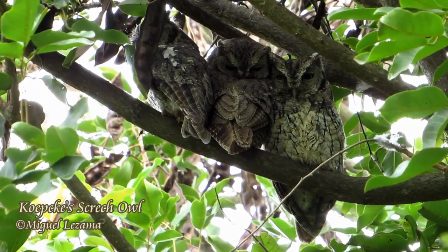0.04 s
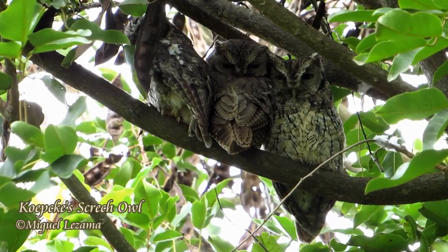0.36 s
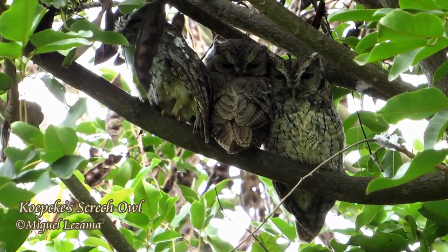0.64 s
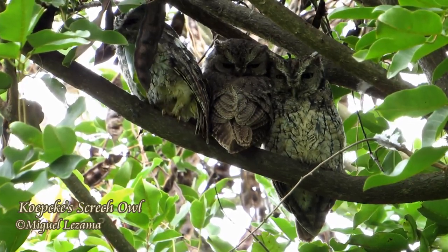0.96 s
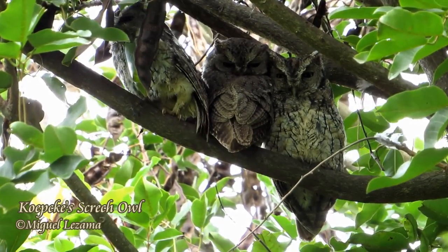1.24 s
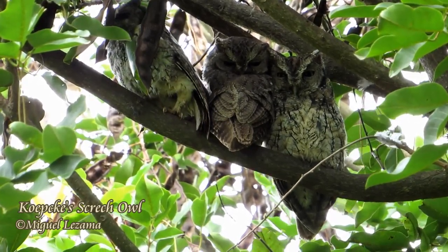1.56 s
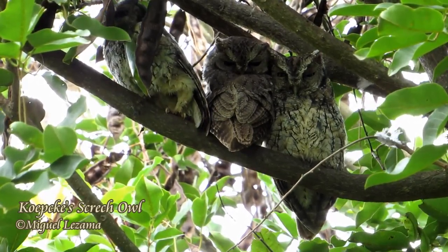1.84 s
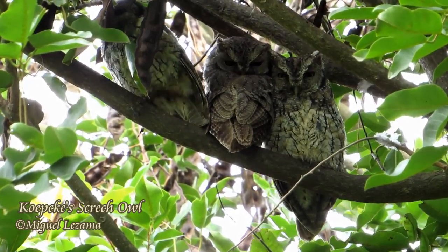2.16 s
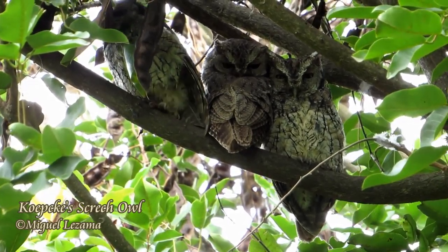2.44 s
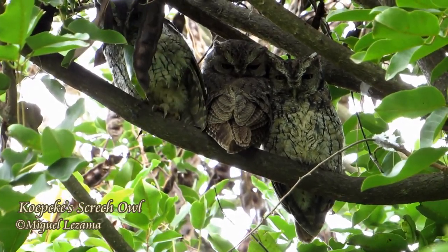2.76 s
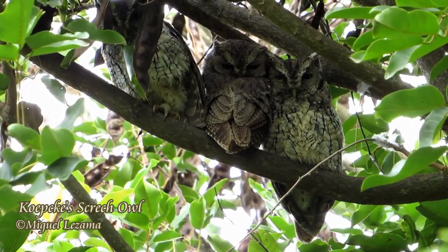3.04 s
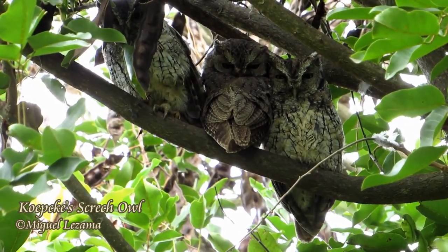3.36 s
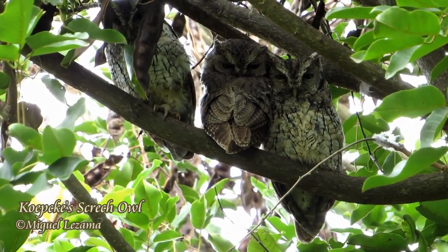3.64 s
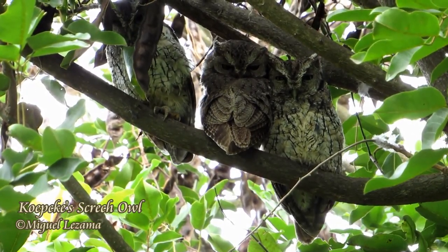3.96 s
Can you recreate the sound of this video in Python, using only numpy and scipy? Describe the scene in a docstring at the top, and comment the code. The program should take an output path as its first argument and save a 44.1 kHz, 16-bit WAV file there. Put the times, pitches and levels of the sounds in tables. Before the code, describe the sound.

Quiet forest ambience with a distant rush, an evenly chirping cricket and light wind on the microphone. A far bird gives two falling whistles, soft knocks and short bird notes follow, and a close camera shutter clacks twice at the end.

```python
"""A quiet forest. From the start a distant rush hangs in the air, a breeze rumbles on the microphone,
an insect holds a thin whine, a far bird gives two falling whistles and a cricket chirps evenly.
After a second come scattered soft knocks among the branches, then short notes from small birds,
reverberating among the trees. At the end something close clacks through two quick cycles,
most likely a camera's mirror and shutter, each impact ringing the casing."""
import sys
import numpy as np
from scipy import signal
from scipy.fft import rfft, irfft
from scipy.io import wavfile

SR = 44100
rng = np.random.default_rng(int(sys.argv[2]) if len(sys.argv) > 2 else 0)


def file_out(sig):
    """Save sig as 16-bit WAV at sys.argv[1]."""
    # one column per channel
    cols = np.atleast_2d(sig).T
    # limit, then scale
    lim = np.clip(cols, -1, 1)
    pcm = np.round(lim * 32767).astype(np.int16)
    wavfile.write(sys.argv[1], SR, pcm)


N = 176400


def undb(db):
    """Amplitude ratio of a level in decibels."""
    return 10 ** (np.asarray(db) / 20)


def unit(x):
    """Normalisation to rms 1."""
    return x / np.sqrt(np.mean(np.abs(x) ** 2) + 1e-20)


def freqs():
    """Frequency of each spectral bin, at least 1 Hz."""
    return np.maximum(np.arange(N // 2 + 1) * SR / N, 1)


def colour(points):
    """Spectral envelope: gain per bin, interpolated over log frequency."""
    hz, db = np.array(points, float).T
    return undb(np.interp(np.log(freqs()), np.log(np.maximum(hz, 1)), db))


def noise(gain):
    """Spectral shaping: white noise weighted per bin, at rms 1."""
    return unit(irfft(rfft(rng.standard_normal(N)) * gain, N))


def resonance(hz, width):
    """Band-pass response of a steep resonance, as gain per bin."""
    return 1 / (1 + ((freqs() ** 2 - hz ** 2) / (freqs() * width * np.sqrt(2))) ** 2)


def drift(rate_hz):
    """Random modulation: low-pass noise of rms 1."""
    return noise(np.exp(-(freqs() / rate_hz) ** 2))


def place(x, pan_db, lead):
    """Stereo localisation: the left channel is pan_db louder and leads by a phase in radians."""
    analytic = signal.hilbert(x)
    return np.array([(analytic * np.exp(.5j * s * lead)).real * undb(s * pan_db / 2) for s in (1, -1)])


def forest(x, t60=.56):
    """Reverberation: scattering from trunks and leaves leaves a diffuse, exponentially decaying tail."""
    t = np.arange(SR) / SR
    tail = rng.standard_normal((3, SR)) * np.exp(-np.log(1000) * t / t60) * (1 - np.exp(-t / .002))
    tail = tail[:2] + 1.25 * tail[2]  # a shared part makes the channels partly coherent
    tail /= np.sqrt(np.sum(tail ** 2, axis=1, keepdims=True))
    return signal.fftconvolve(x[None], tail, axes=1)[:, :N]


# Spectra of the air, in phase and in antiphase between channels (frequency [Hz], relative level [dB])
AIR_MID_SPECTRUM = [(30, -8), (100, -13.5), (300, -12), (430, -15.5), (600, -15), (750, -6), (1050, -13.5),
                    (2000, -22.5), (3300, -22.5), (4000, -24), (7400, -28.5), (8000, -31.5), (10000, -31),
                    (13000, -38.5), (15000, -52)]
AIR_SIDE_SPECTRUM = [(35, -47), (60, -5), (399, -7.5), (438, -20), (514, -10), (711, -14.5), (1960, -23),
                     (3340, -26), (4020, -30), (7680, -31.5), (15000, -45)]
# Resonances of the distant rush (frequency [Hz], bandwidth [Hz], level [dB], left lead [rad])
RUSH_BANDS = [(524, 35, -54.5, 1.72), (713.3, 47, -51.5, 0.84), (802.5, 51, -55.5, 2.03),
              (870.6, 53, -54, 1.02), (1329, 89, -61, 1.6)]
def air():
    """Ambient noise: a broadband hiss, in antiphase in the bass, and a hollow rush in resonant bands."""
    mid = noise(colour(AIR_MID_SPECTRUM)) * undb(-49 + .5 * drift(2))
    side = noise(colour(AIR_SIDE_SPECTRUM)) * undb(-45.5 + .53 * drift(4.2))
    rush = 0
    for hz, width, db, lead in RUSH_BANDS:
        band = noise(resonance(hz, width)) * undb(db + .92 * drift(15))
        rush += place(band, pan_db=-4.5, lead=lead)
    return np.array([mid + side, mid - side]) + rush


# Strength of the gusts (time [s], level [dB])
GUST_LEVELS = [(0, -47.5), (.33, -37), (.41, -41.5), (.49, -37), (.6, -43.5), (.75, -28), (.85, -46),
               (.97, -47), (1.3, -50), (1.41, -32.5), (1.62, -43), (1.73, -31.5), (1.93, -33.5),
               (2.02, -60), (2.3, -46), (2.48, -31.5), (2.69, -31.5), (2.77, -25.5), (2.92, -41.5),
               (3.12, -38), (3.3, -54), (3.78, -72), (4, -22)]
# Spectrum of their rumble (frequency [Hz], relative level [dB])
GUST_SPECTRUM = [(8, -6), (20, -1.5), (45, 4), (75, -16), (120, -24), (250, -51), (800, -90)]
def breeze(t):
    """Wind noise: gusts push the two microphone ports in antiphase; a faint flutter reaches both alike."""
    gust = undb(np.interp(t, *np.array(GUST_LEVELS).T) + 2 * drift(12))
    rumble = place(gust * noise(colour(GUST_SPECTRUM)), pan_db=2.5, lead=np.pi)
    flutter = undb(-26) * gust * noise(resonance(hz=78, width=36))
    return rumble + flutter


def whine(t):
    """Frequency modulation: an insect's thin tone jitters about a slowly rising pitch."""
    hz = 7465 + 32 * t + 8 * drift(4) + 35 * drift(250)
    phase = 2 * np.pi * np.cumsum(hz) / SR
    song = unit(np.sin(phase)) * undb(-63 + .26 * drift(40))
    return undb(-3.5) * song + undb(-13) * forest(song)


def syrinx(age, hz, length, attack, release):
    """A bird's voice: a nearly pure tone under random frequency and amplitude modulation."""
    envelope = np.clip(np.minimum(age / attack, (length - age) / release), 0, 1)
    phase = 2 * np.pi * np.cumsum(hz * (1 + .008 * drift(117))) / SR
    return envelope * undb(2.6 * drift(38)) * unit(np.sin(phase))


# Glide of a whistle (time since onset [s], frequency [Hz])
WHISTLE_GLIDE = [(0, 5200), (.05, 5310), (.1, 5170), (.15, 4900), (.2, 4550), (.25, 4290), (.35, 3730),
                 (.45, 3390), (.5, 3160), (.62, 2780)]
# Its swell (time since onset [s], relative level [dB])
WHISTLE_LEVELS = [(0, 0), (.1, 0), (.16, -2), (.23, 1), (.31, -3), (.43, 2), (.6, .5)]
# The whistles (onset [s], duration [s], level [dB], left lead [rad], reverberation gain [dB])
FALLING_WHISTLES = [(-.2, .6, -53.5, -.4, 3), (.5, .41, -53.5, -.3, 1.5)]
def far_bird(t):
    """Falling glides smeared by reverberation, which at a distance outweighs the direct sound."""
    lead_in_s = .25  # the first whistle is already under way at time zero
    out = 0
    for start, length, db, lead, echo_db in FALLING_WHISTLES:
        age = t - lead_in_s - start
        hz = np.interp(age, *np.array(WHISTLE_GLIDE).T)
        effort = undb(db + np.interp(age, *np.array(WHISTLE_LEVELS).T))
        note = effort * syrinx(age, hz, length, attack=.025, release=.1)
        out += place(note, 0, lead) + undb(echo_db) * forest(note)
    return np.pad(out, ((0, 0), (0, int(lead_in_s * SR))))[:, -N:]


def cricket(t):
    """Stridulation: each chirp scoops up to the wing's pitch, swells, dips once and echoes off trees."""
    first_s, period_s, length_s, attack_s, release_s = .028, .1237, .067, .004, .022
    wing_hz, scoop_hz, swell_db_per_s = 3395, 240, 75
    age = (t - first_s + .001 * drift(3)) % period_s
    hz = (wing_hz - scoop_hz * np.exp(-age / .015)) * (1 + .005 * drift(150))
    phase = 2 * np.pi * np.cumsum(hz) / SR
    tone = unit(np.sin(phase) + undb(-13) * np.sin(2 * phase))
    envelope = np.clip(np.minimum(age / attack_s, (length_s - age) / release_s), 0, 1)
    dip_db = -6 * np.exp(-((age - .038) / .004) ** 2)
    waver_db = .9 * drift(8.7) + 1.8 * drift(86)
    song = envelope * undb(-57 + swell_db_per_s * age + dip_db + waver_db) * tone
    reflection = undb(-12) * np.interp(t - .05, t, song)
    return song + reflection + undb(-8) * forest(song)


# Knocks (onset [s], level [dB], frequency [Hz], bandwidth [Hz], decay time [s], left lead [rad])
BRANCH_KNOCKS = [(1.061, -41, 900, 900, .003, .43), (1.822, -46, 2620, 2000, .005, 1.9),
                 (1.842, -47, 3000, 2000, .0051, 1.7), (2.766, -37.5, 755, 220, .012, 1),
                 (2.885, -40, 780, 250, .006, 1), (3.212, -42, 240, 260, .022, 1.6)]
def knocks(t):
    """Damped resonance: each soft tap among the branches is a noise band that decays exponentially."""
    out = 0
    for start, db, hz, width, decay, lead in BRANCH_KNOCKS:
        age = np.maximum(t - start, 0)
        envelope = (1 - np.exp(-age / (decay / 10))) * np.exp(-age / decay)
        out += place(undb(db) * envelope * noise(resonance(hz, width)), 0, lead)
    return out


# Short notes (onset [s], duration [s], level [dB], left minus right [dB], left lead [rad],
# reverberation gain [dB], frequencies at equal time steps [Hz])
BIRD_NOTES = [ (1.59, 0.048, -64.5, 0, 0, 3, [5300, 4600, 5000, 4200]),
              (1.772, .036, -46, 20, .69, -20, [4180, 4320, 4400, 4370]),
              (1.799, .024, -43, 16, .69, -18, [4620, 4490, 4540, 4680]),
              (1.824, .014, -45.5, 9, 1.7, -13, [4350, 4230, 4080]),
              (1.85, .23, -52, -1.5, -1.2, -7, [2550, 2950, 3190, 3330, 3390, 3380, 3350, 3370, 3400]),
              (1.974, .07, -56, 6, 1.4, -18, [4180, 4120, 4050, 3620]),
              (2.63, .09, -64, -6, 0, 4, [4200, 4400, 4900, 4500]),
              (3.0, 0.043, -60, 0, 0, -6, [7650, 6900, 6900, 8400]),
              (3.311, 0.046, -59, 2, 0, 4, [5840, 5200, 4400, 3500])]
def small_birds(t):
    """Short glides, heard as near or far by their ratio of direct to reverberant sound."""
    direct, scattered = 0, 0
    for start, length, db, pan_db, lead, echo_db, pitches in BIRD_NOTES:
        age = t - start
        hz = np.interp(age, np.linspace(0, length, len(pitches)), pitches)
        attack, release = min(.57 * length, .045), min(.39 * length, .045)
        note = undb(db) * syrinx(age, hz, length, attack, release)
        direct += place(note, pan_db, lead)
        scattered += undb(echo_db) * note
    return direct + forest(scattered)


# Spectrum of the casing (frequency [Hz], relative level [dB])
CASING_SPECTRUM = [(200, -24), (700, -7), (1400, 2.5), (2300, -1), (3400, -1), (5500, 0), (7200, 1),
                   (8500, 0), (12000, -3), (15000, -18)]
# Its normal modes (frequency [Hz], 60 dB decay time [s], relative level [dB])
CASING_MODES = [(1498, 0.07, -19), (3470, 0.035, -14), (4460, 0.023, -14), (4880, 0.026, -13),
                (5950, 0.02, -18)]
# Phase difference of the clacks between the ports (frequency [Hz], left lead [rad])
CLACK_PHASE = [(200, 2.42), (1100, 0.65), (1700, 1.22), (3300, 1.16), (5900, 1.4), (7500, 2.59),
               (8200, 3.33), (13000, 3.67)]
# Impacts (time [s], level [dB], emphasis [Hz], attack time [s], decay time [s], thud gain [dB])
SHUTTER_IMPACTS = [(3.7570, -38.5, 5000, .0003, .002, -24), (3.767, -40, 4500, .0003, .003, -14),
                   (3.7746, -16.5, 5400, .00015, .0017, -18), (3.787, -32, 4800, .003, .003, -10),
                   (3.7897, -20.5, 3360, .0004, .003, -9), (3.8256, -23, 6600, .0004, 0.0023, -12.5),
                   (3.829, -22.5, 7000, .0004, .0028, -26), (3.8524, -19, 6460, 0.0004, 0.0018, -20),
                   (3.853, -24.5, 3180, 0.00074, 0.0038, -23), (3.8686, -31, 3150, 0.005, 0.0031, -12),
                   (3.8792, -29, 3300, .00027, 0.0023, -15), (3.9227, -16.5, 5000, .00015, .0016, -18),
                   (3.938, -21, 3300, 0.00056, 0.0037, -7.5), (3.9406, -28, 5000, 0.00044, 0.0018, -7),
                   (3.9693, -24, 6560, .00037, 0.0024, -21), (3.9732, -20.5, 5170, 0.00036, 0.0019, -27),
                   (3.9962, -18, 7300, 0.00061, 0.0056, -20)]
def shutter(t):
    """Impact excitation: small parts strike with a crack, a thud, a modal ring and a short noisy tail."""
    casing = colour(CASING_SPECTRUM)
    direct, tail_power = np.zeros(N), np.zeros(N)
    for start, db, hz, attack, decay, thud_db in SHUTTER_IMPACTS:
        age = np.maximum(t - start, 0)
        blow = undb(db) * np.exp(np.clip((t - start) / attack, -20, 0))  # rises, then holds
        emphasis_db = 11 * np.exp(-(np.log2(freqs() / hz) / .25) ** 2)
        crack = noise(casing * undb(emphasis_db)) * np.exp(-age / decay)
        thud = undb(thud_db) * noise(resonance(hz=257, width=100)) * np.exp(-age / .0053)
        ring = sum(undb(mode_db) * np.sin(2 * np.pi * mode_hz * age) * np.exp(-np.log(1000) * age / t60)
                   for mode_hz, t60, mode_db in CASING_MODES)
        direct += blow * (crack + thud + ring)
        tail_power += (blow * np.exp(-age / .023)) ** 2  # incoherent tails add in power
    tail = np.sqrt(tail_power)
    direct += undb(-14) * tail * noise(casing)
    echo = undb(-24.5) * tail * np.array([noise(casing), noise(casing)])
    spectrum, pan_db = rfft(direct, 2 * N), 3
    lead = np.interp(np.linspace(0, SR / 2, N + 1), *np.array(CLACK_PHASE).T)
    ports = [irfft(spectrum * np.exp(.5j * s * lead))[:N] * undb(s * pan_db / 2) for s in (1, -1)]
    return np.array(ports) + echo


def scene():
    """Superposition: the pressures of all sources add at the microphone."""
    t = np.arange(N) / SR
    background = air() + breeze(t) + whine(t)
    return background + far_bird(t) + cricket(t) + knocks(t) + small_birds(t) + shutter(t)


def record(dry):
    """Band limiting: a steep elliptic low-pass filter removes the treble above 15 kHz."""
    return signal.sosfilt(signal.ellip(8, .2, 70, 15000, fs=SR, output="sos"), dry)


dry = scene()
out = record(dry)
file_out(out)
```